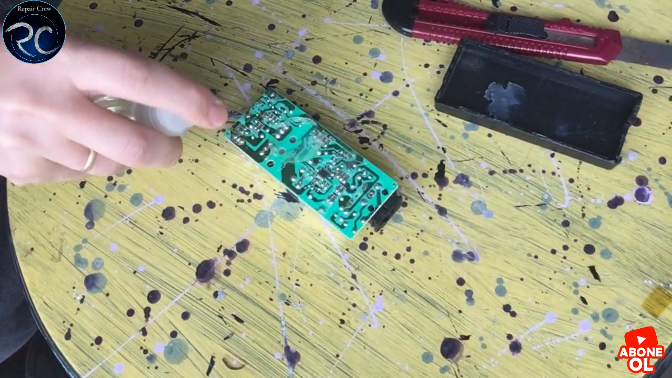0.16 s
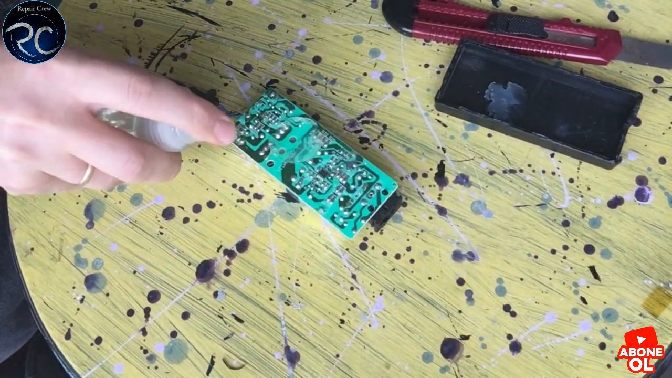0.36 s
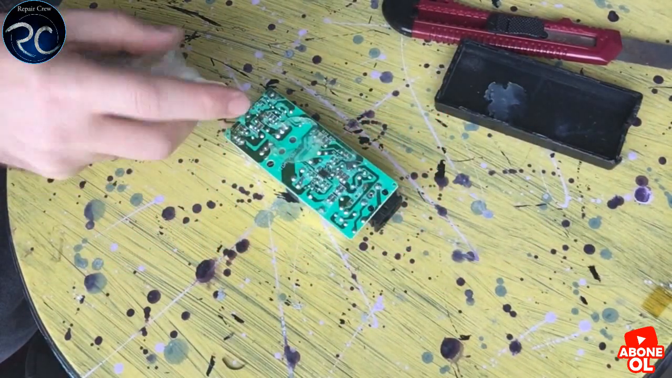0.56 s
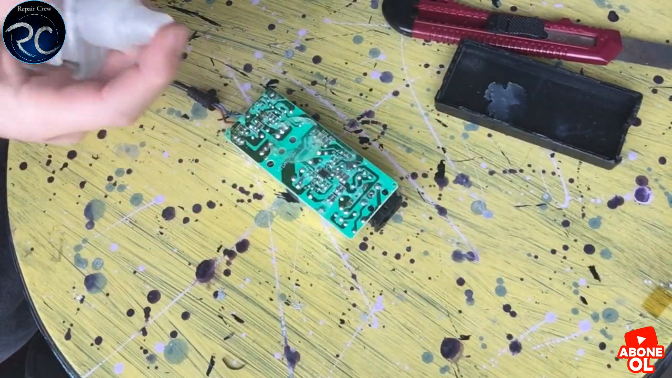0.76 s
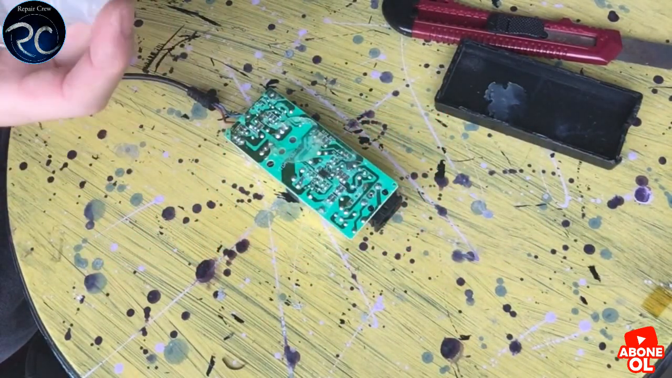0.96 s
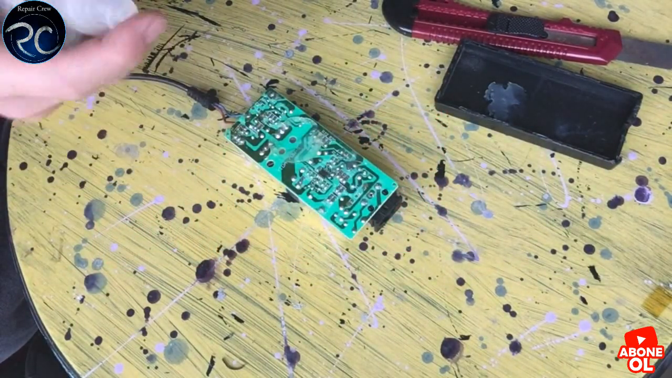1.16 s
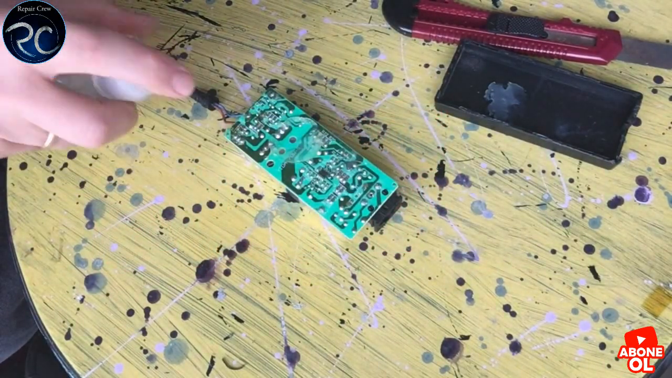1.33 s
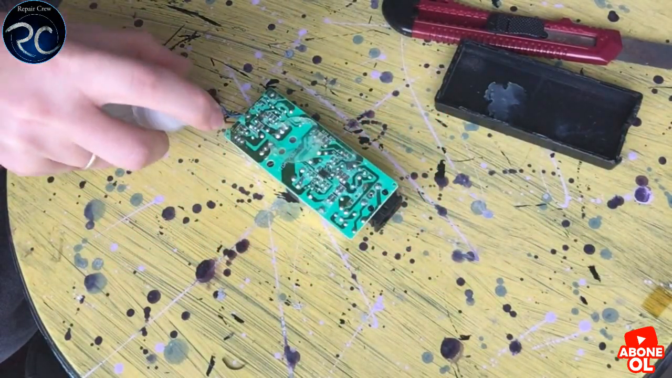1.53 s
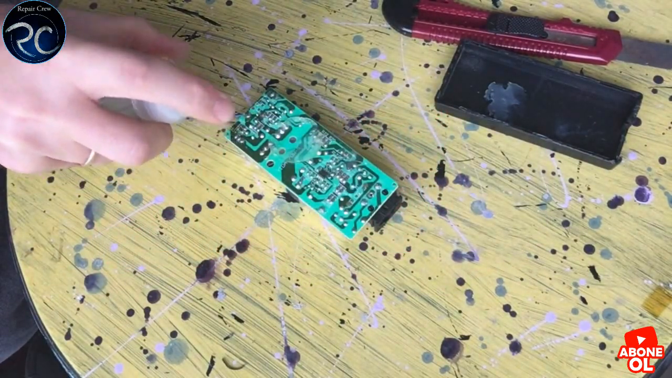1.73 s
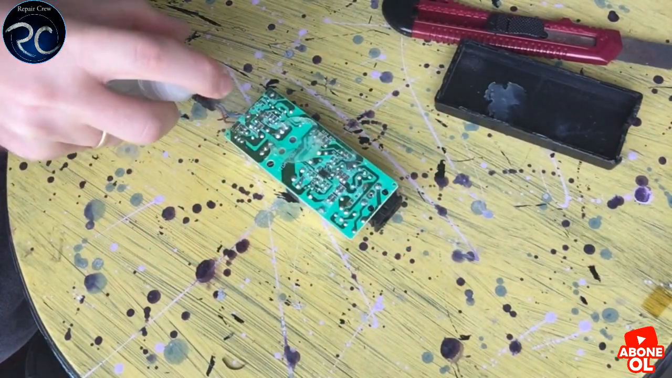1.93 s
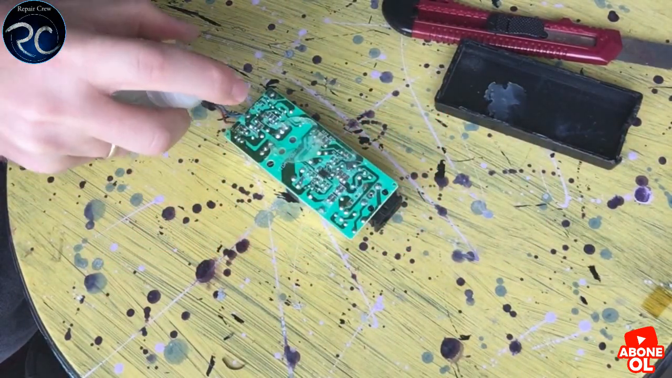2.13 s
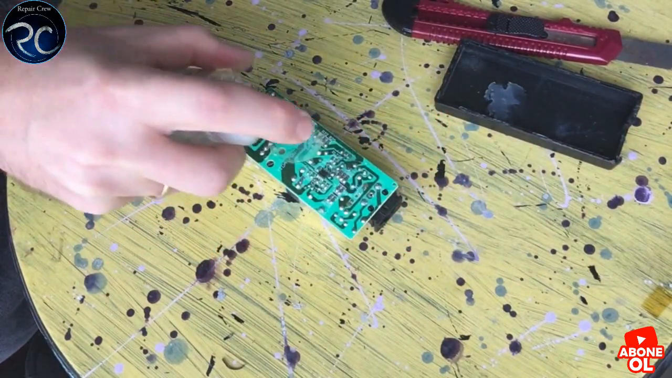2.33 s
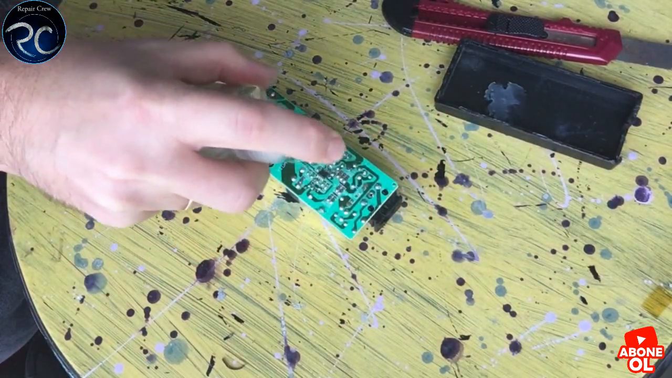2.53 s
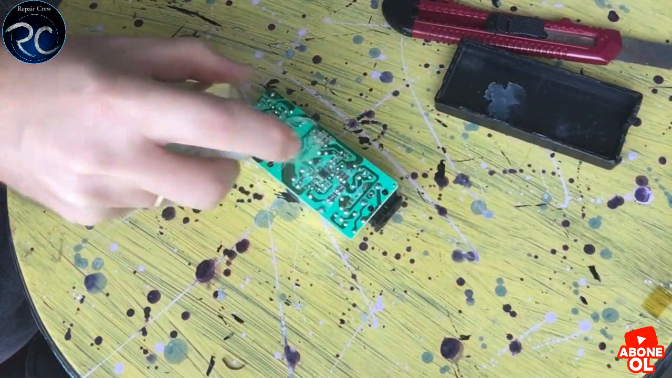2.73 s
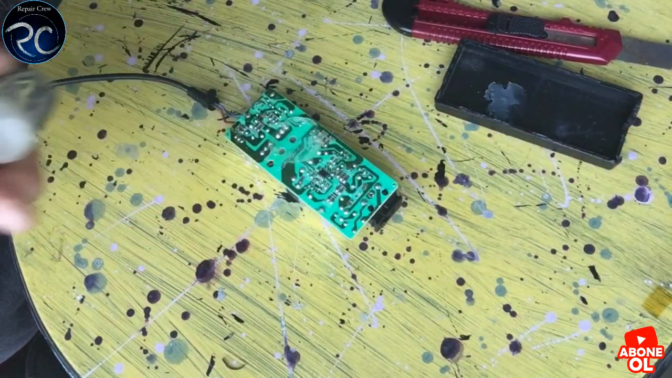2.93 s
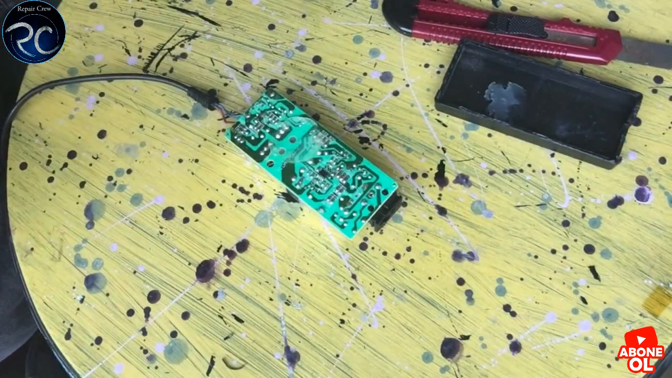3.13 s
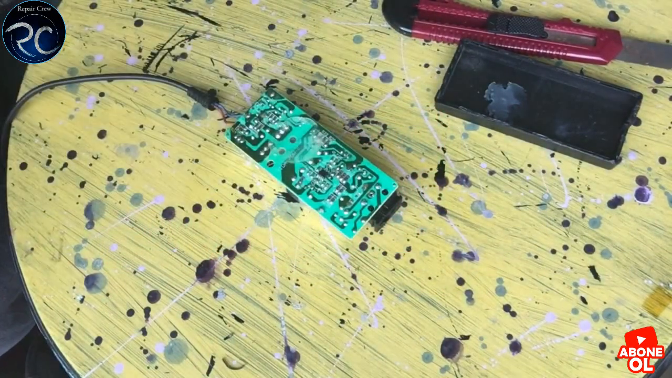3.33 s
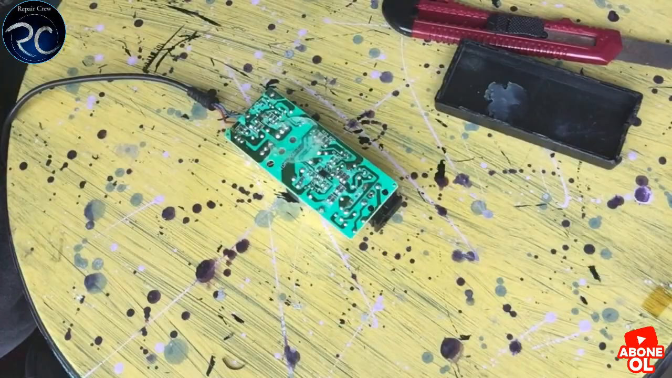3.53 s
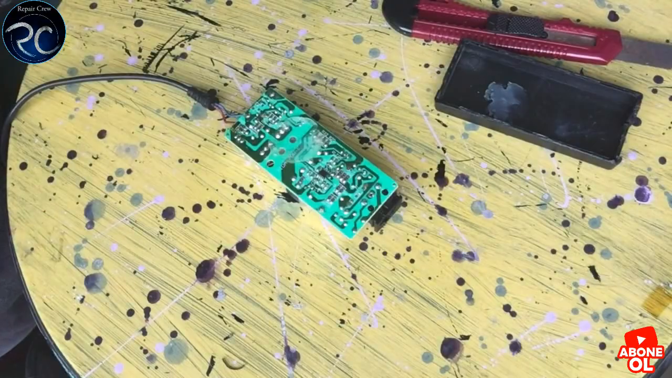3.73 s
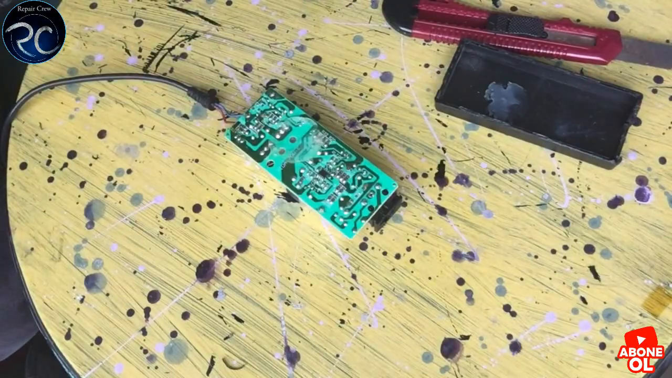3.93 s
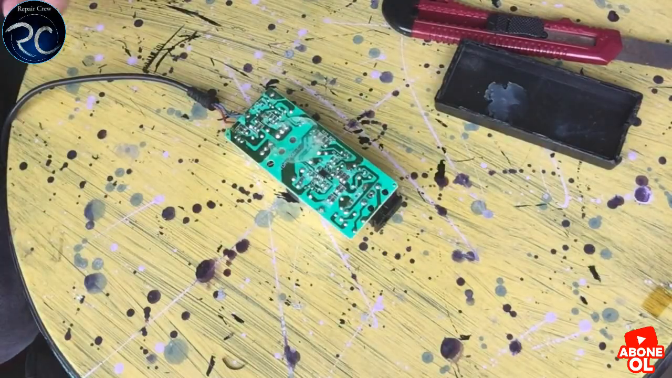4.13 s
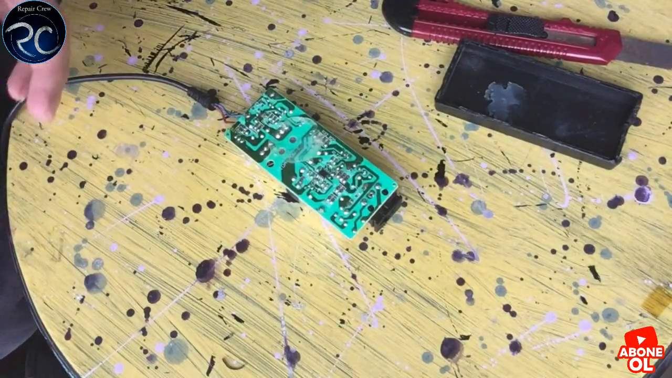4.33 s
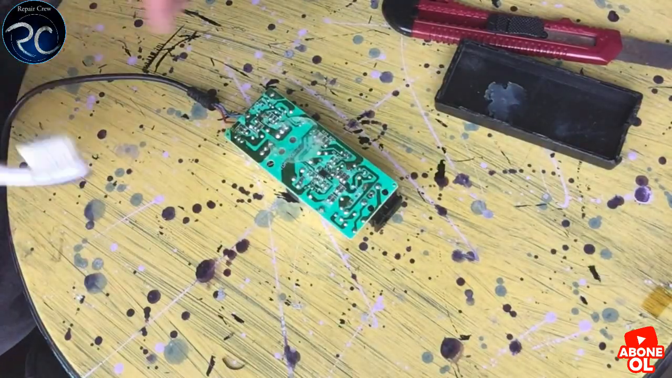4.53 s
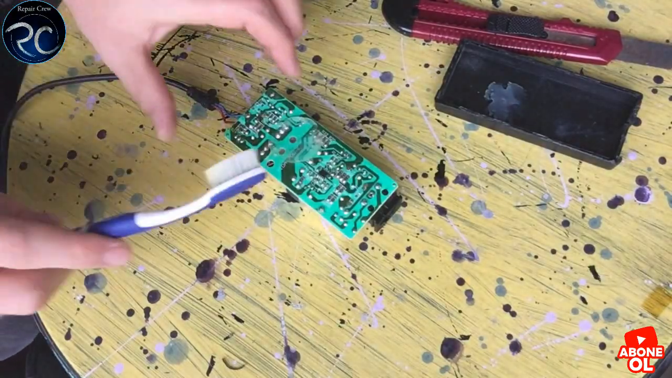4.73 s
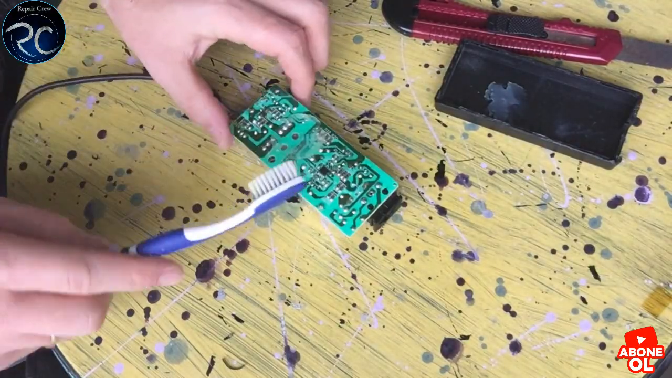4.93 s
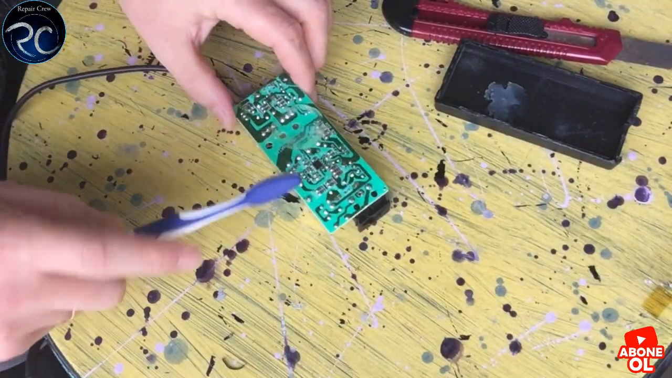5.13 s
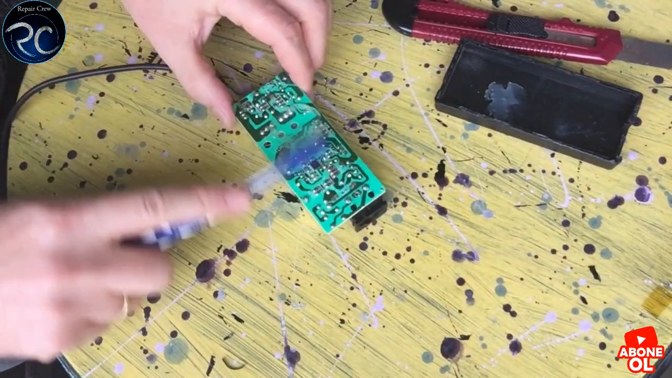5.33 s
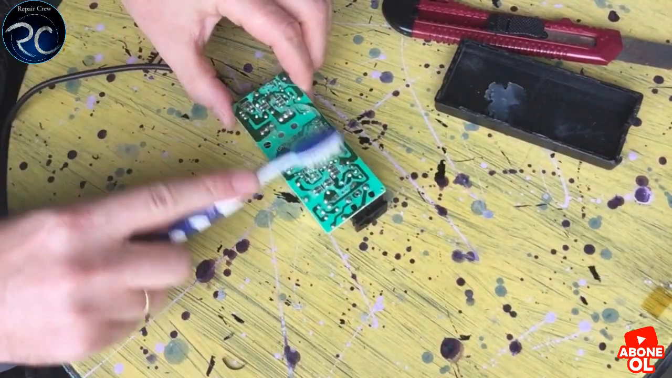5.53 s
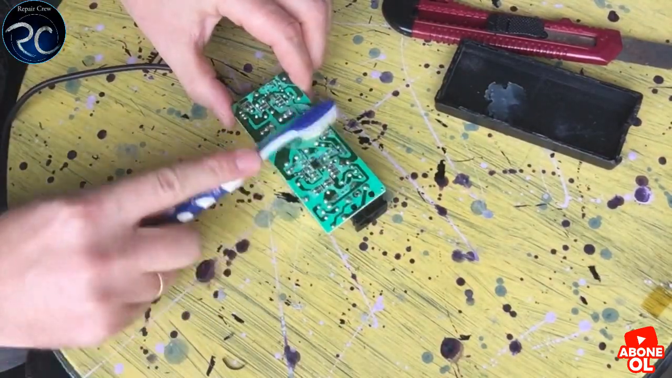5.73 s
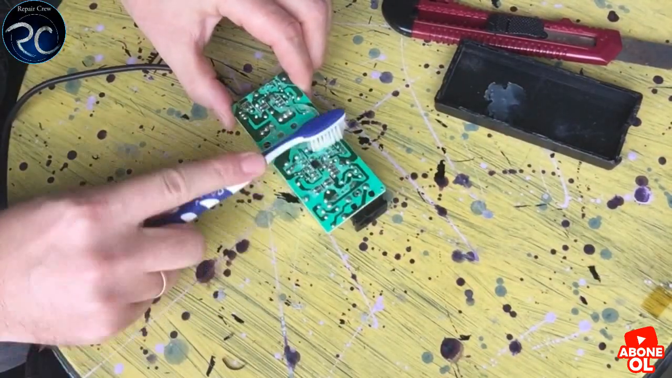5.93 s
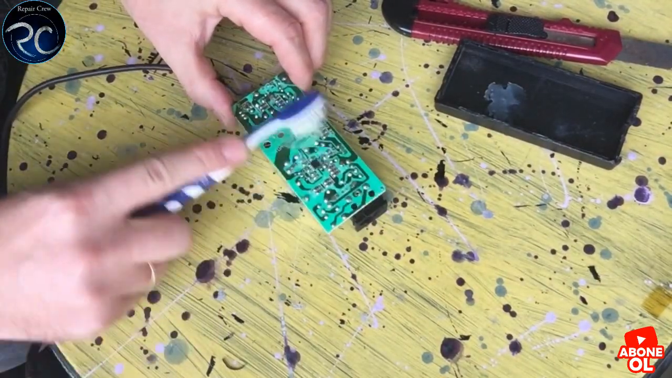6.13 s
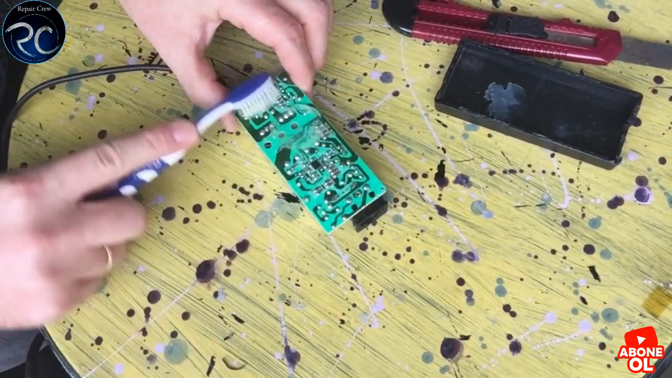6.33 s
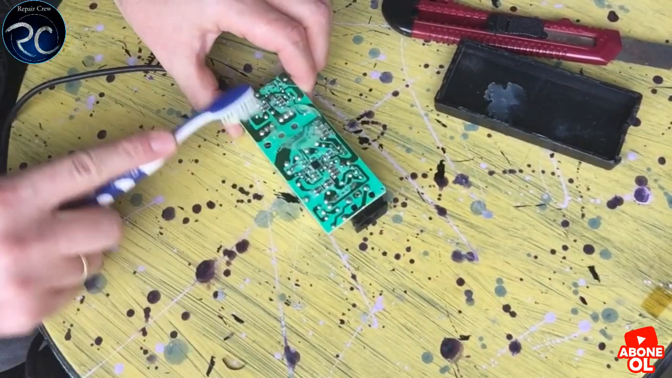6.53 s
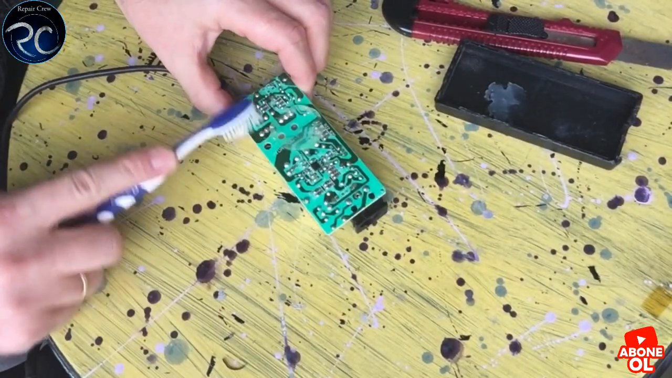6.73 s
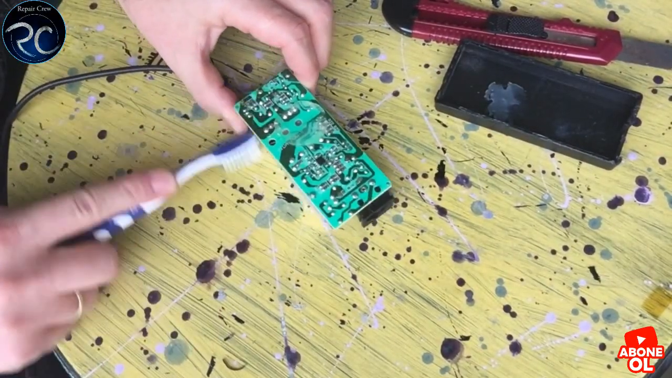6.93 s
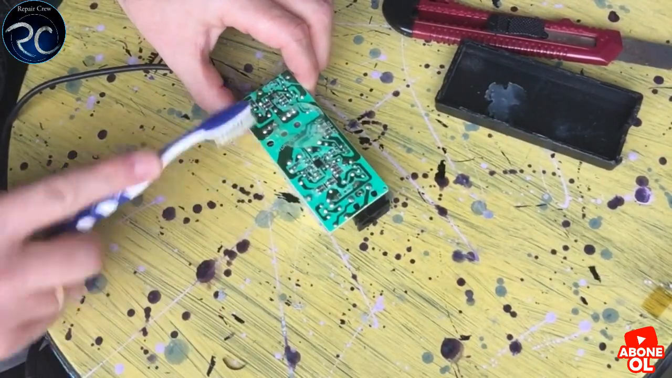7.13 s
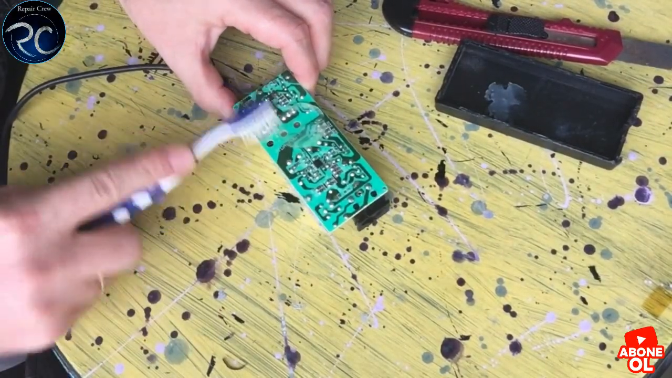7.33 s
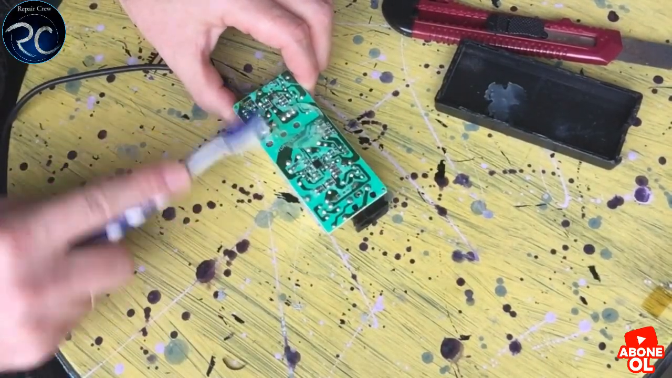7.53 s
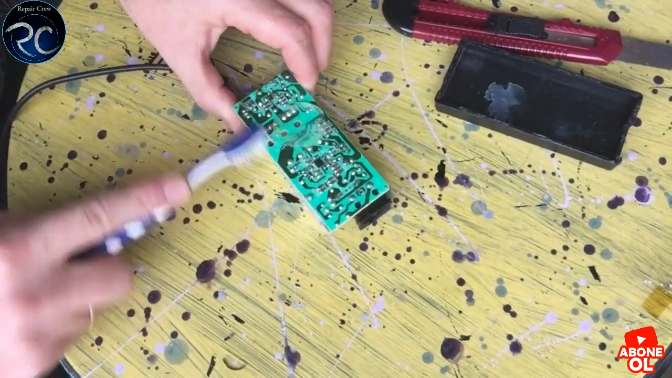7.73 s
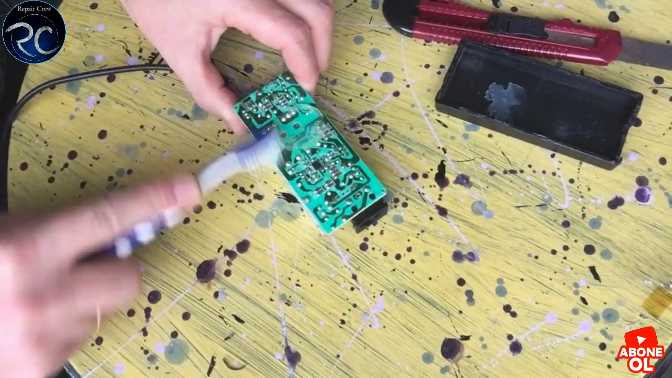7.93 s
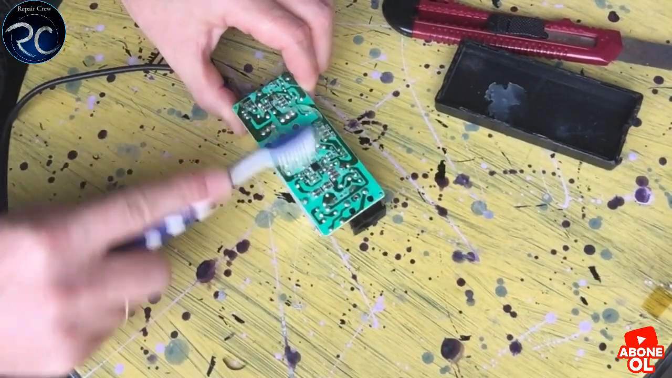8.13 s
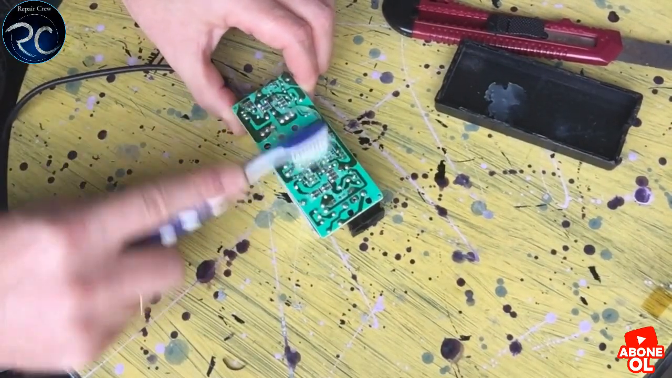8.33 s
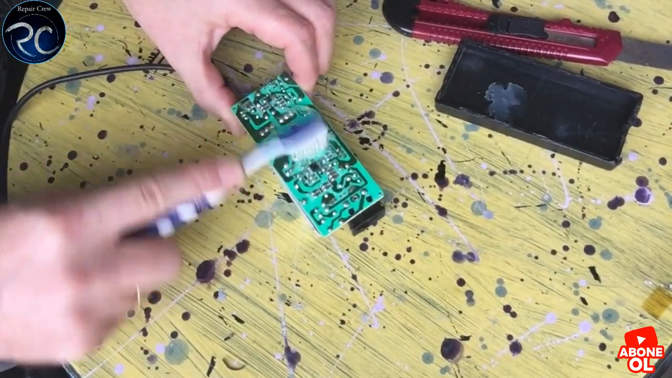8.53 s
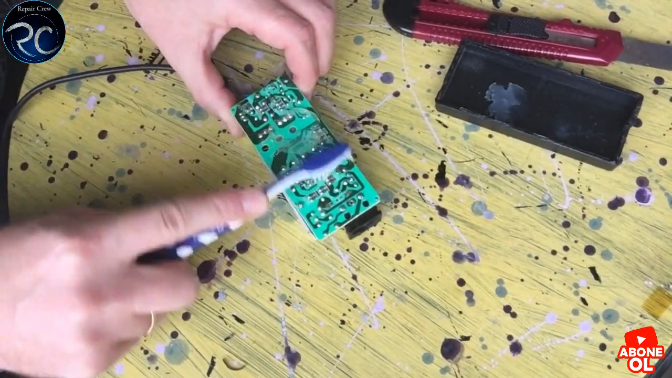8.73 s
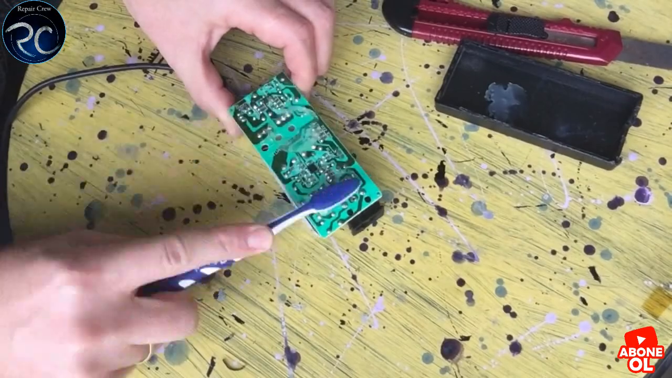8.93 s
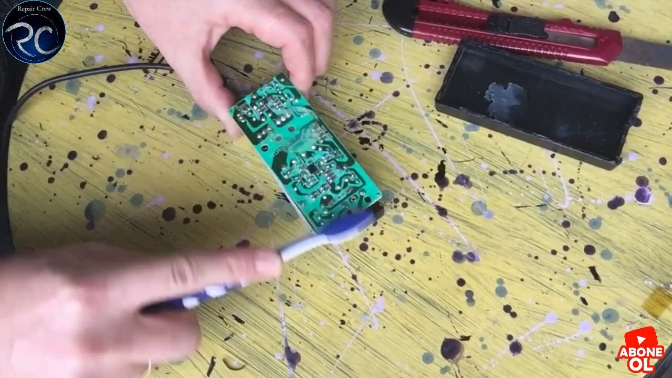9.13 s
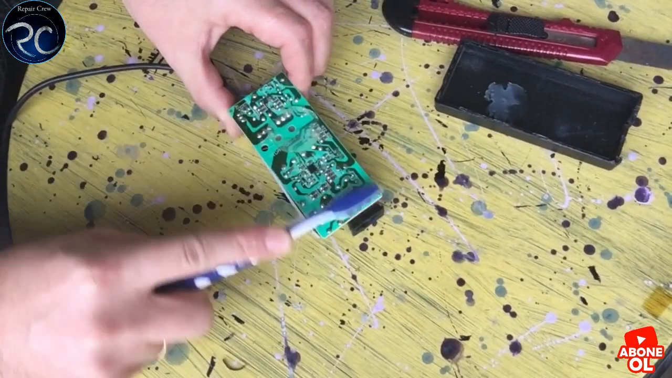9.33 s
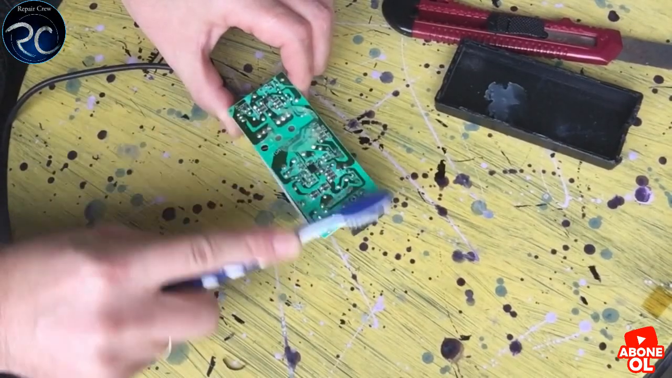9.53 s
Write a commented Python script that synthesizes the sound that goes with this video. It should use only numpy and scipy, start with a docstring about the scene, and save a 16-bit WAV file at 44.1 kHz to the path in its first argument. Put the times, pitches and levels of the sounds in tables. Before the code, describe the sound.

In a small quiet room, a microphone just above a workbench picks up six short, clicking spritzes from a pump bottle, which then thuds down. After a brief pause and a scuff, a toothbrush rasps rapidly to and fro over a circuit board for the whole second half. The bristles snag and click on the solder pins and the board bumps the bench, over faint room air and mains hum.

```python
"""A workbench in a small quiet room, one microphone just above it. A finger pump sprays cleaner six times
onto a bare circuit board, clicking and hissing, and near 4 s the bottle is set down with a thud. A hand
grips the board, which scuffs over the bench. From 5.3 s a toothbrush scrubs it, nearly ten strokes a second:
the bristles flick over the solder pins, the brush head bumps and snags on them, and the rocking board knocks
on the bench top. Room air, microphone hiss and a faint mains hum lie underneath."""
import sys
import numpy as np
from scipy import signal
from scipy.fft import rfft, irfft, next_fast_len
from scipy.io import wavfile
from scipy.ndimage import map_coordinates

SR = 44100
rng = np.random.default_rng(int(sys.argv[2]) if len(sys.argv) > 2 else 0)


def dump_mix(stems):
    """Bounce the given channels to the path in sys.argv[1] as a 16-bit WAV at rate SR."""
    frames = np.atleast_2d(stems).T  # one column per channel
    limited = np.clip(frames, -1, 1)  # hard clip at full scale
    pcm = np.round(limited * 32767).astype(np.int16)
    wavfile.write(sys.argv[1], SR, pcm)


N = 422037
AGE = np.arange(SR // 4) / SR  # seconds since a blow
TOP_HZ = 15100  # upper band limit

# resonances of the circuit board: pitch_hz, width_hz, level_db
BOARD_MODES = [(601, 54.4, -6.5), (671.5, 51.3, 1), (759, 64, -4.5), (1078, 56, -21.5)]
# resonances of the bench top: pitch_hz, width_hz, level_db
BENCH_MODES = [(115, 20, -11), (185, 21.5, -2), (198.9, 14.3, 2.5), (255.2, 12.3, -1.5), (305, 68, -18),
               (354.2, 32, -10), (464, 110, -27)]
# spectrum of the brush's hiss and crack on the board: frequency_hz, level_db
HISS_SPECTRUM = [(2500, -16), (4200, 5.5), (5000, 2.5), (6600, -11), (7700, 1.5), (8800, -1),
                 (10300, -13.5), (11200, -15.5), (15000, -43)]


def scrubbing():
    """Bristles hiss over the lacquer and flick off the pins, shaking the board and the bench under it."""
    # brush strokes, to and fro: start_s, length_s, rasp_db, board_db, bench_db, hiss_db
    strokes = [(5.305, 0.09, -50, -68, -49.5, -74), (5.408, 0.08, -44, -53.5, -47, -71.5),
               (5.499, 0.14, -50.5, -51.5, -45.5, -71), (5.62, 0.12, -53.5, -56, -51.5, -77),
               (5.721, 0.14, -53, -54.5, -60, -73.5), (5.833, 0.11, -51.5, -57, -48, -75),
               (5.948, 0.11, -50, -50.5, -47, -71), (6.046, 0.12, -52, -54, -48, -71),
               (6.177, 0.12, -49.5, -65, -55, -72), (6.264, 0.1, -47.5, -55.5, -61, -71),
               (6.379, 0.11, -48, -61.5, -49, -74), (6.475, 0.1, -49.5, -50.5, -45.5, -74),
               (6.573, 0.11, -49.5, -62, -48.5, -73), (6.663, 0.11, -48.5, -60, -46.5, -73),
               (6.776, 0.13, -46.5, -55.5, -48.5, -74), (6.88, 0.078, -45.5, -35, -40, -92),
               (7.211, 0.075, -43.5, -57.5, -47, -71), (7.3, 0.072, -46.5, -65, -52, -71.5),
               (7.408, 0.1, -45, -61, -45, -71), (7.492, 0.1, -46, -57, -46, -69),
               (7.598, 0.103, -45, -52, -43, -68.5), (7.686, 0.12, -49.5, -49.5, -45, -69.5),
               (7.792, 0.15, -52, -61.5, -50, -75.5), (7.887, 0.12, -48.5, -60, -47, -71.5),
               (7.998, 0.11, -48, -64, -64, -72), (8.096, 0.11, -49, -55.5, -46.5, -70.5),
               (8.202, 0.12, -47.5, -67, -56, -68), (8.308, 0.11, -48, -50.5, -43.5, -68),
               (8.41, 0.1, -49, -57.5, -50.5, -67), (8.506, 0.11, -46.5, -52.5, -40, -67.5),
               (8.613, 0.11, -40, -64, -53, -65.5), (8.728, 0.12, -51.5, -62, -51, -73.5),
               (8.843, 0.092, -46, -53.5, -49, -66), (8.956, 0.12, -50, -62, -54, -70),
               (9.056, 0.11, -48, -52.5, -45, -64.5), (9.16, 0.099, -50.5, -60, -49, -69),
               (9.258, 0.099, -49, -59.5, -49.5, -66), (9.363, 0.11, -51, -62.5, -49.5, -71.5),
               (9.474, 0.094, -47.5, -56, -45, -64.5)]
    # bristles rasping on the pins: frequency_hz, level_db
    rasp_spectrum = [(300, -36.5), (800, -23), (1110, -10), (1260, -15), (1450, -5.5), (1770, -7),
                     (2080, 1), (2280, -12), (2500, 0.5), (2830, 3.5), (3100, -7), (3450, -10.5),
                     (3900, -16.5), (4340, -50), (5640, -40), (9000, -59.5)]
    # the bench's low rumble: frequency_hz, level_db
    rumble_spectrum = [(20, -33), (30, -10), (43, 13.0), (62, -15.5), (90, -22.5), (120, -12.5),
                       (250, -26.5), (2000, -92.5)]
    overhang_s = 0.012  # board and bench keep moving after the brush turns
    rumble = unit(colour(rng.standard_normal(N + SR), rumble_spectrum))
    out = np.zeros(N)
    for start, length, rasp_db, board_db, bench_db, hiss_db in strokes:
        end = start + length
        first = round(start * SR)
        count = round((end + overhang_s) * SR) - first
        # tufts catch on rows of pins, so the flicks come in clumps
        catch = amp(3.2 * wobble(count, rate=74.7))
        bristles = unit(flicks(count, rate=1500, spread_db=4)) + 0.66 * rng.standard_normal(count)
        drag = catch * bristles + amp(2) * tufts(count)
        grit = catch * flicks(count, rate=4000, spread_db=4)
        hiss = unit(colour(grit, shaded(HISS_SPECTRUM, depth_db=3.5)))
        rasp = unit(colour(drag, shaded(rasp_spectrum, depth_db=3)))
        # only a few strong flicks rock the board
        jolts = flicks(count, rate=110, spread_db=6) + 0.012 * drag
        board = unit(shaken(jolts, BOARD_MODES, spread_db=4, detune=0.06))
        bench = unit(shaken(jolts, BENCH_MODES, spread_db=6, detune=0.06))
        bench += amp(-12) * rumble[first:first + count]
        shake = amp(board_db) * board + amp(bench_db) * bench
        sweep = swell(start, end, rest=0.013, power=1.9, lean=0.76)
        # the bent bristles bite hardest a little before mid-stroke
        bite = swell(start, end, rest=0.04, power=1.7, lean=0.9)
        rocking = swell(start, end + overhang_s, rest=0, power=0.81, lean=0.95)
        add(out, start, sweep * amp(hiss_db) * hiss[:len(sweep)])
        add(out, start, bite * amp(rasp_db) * rasp[:len(bite)])
        add(out, start, rocking * shake)
    return out


def tufts(count, rate=110, t60=0.016):
    """Bent tufts let go unevenly, about rate a second; each scratches briefly."""
    jitter, size = rng.standard_normal((2, 64))
    onsets = (np.cumsum(np.exp(0.45 * jitter)) * SR / rate).astype(int)
    lets_go = np.bincount(onsets, amp(3.2 * np.clip(size, -2, 2)), count)[:count]
    envelope = signal.lfilter([1], [1, -amp(-60 / (t60 * SR))], lets_go)
    return unit(envelope * rng.standard_normal(count))


def bumps():
    """A struck pin pings and rattles; a moment later the rocking board and the bench top answer."""
    # the hand grips the board or the brush head hits it:
    # start_s, tick_db, rattle_t60_s, board_db, bench_db, bench_pitch_hz
    hits = [(4.881, -80, 0.14, -79, -46, 223), (4.937, -73, 0.37, -57, -35.5, 195),
            (5.059, -64, 0.16, -62, -41.5, 253), (5.256, -54, 0.15, -71, -41.5, 189),
            (5.322, -67, 0.089, -48.5, -40, 190), (5.461, -46.5, 0.038, -64, -43, 237),
            (5.529, -39, 0.1, -52, -41, 201), (5.572, -52, 0.057, -55, -45, 230),
            (5.69, -53, 0.061, -66, -44, 249), (5.743, -47, 0.066, -47.5, -41.5, 172),
            (5.759, -40.5, 0.05, -50.5, -56, 250), (5.92, -58.5, 0.024, -60, -46, 196),
            (5.967, -40, 0.072, -52.5, -46.5, 276), (5.995, -44, 0.0066, -67, -45.5, 308),
            (6.022, -64, 0.14, -51, -51, 227), (6.12, -41.5, 0.12, -69, -39.5, 202),
            (6.219, -49, 0.26, -51, -37, 184), (6.284, -40.5, 0.064, -71, -42, 187),
            (6.493, -39, 0.12, -64, -35, 241), (6.549, -52, 0.045, -54, -49, 224),
            (6.599, -42, 0.063, -47.5, -43, 179), (6.677, -46.5, 0.17, -52.5, -40.5, 184),
            (6.825, -44, 0.039, -70, -54, 200), (6.853, -34.5, 0.074, -53, -37, 178),
            (6.874, -54, 0.17, -43.5, -27, 191), (6.892, -38.5, 0.24, -49, -27, 187.4),
            (6.946, -54, 0.36, -45, -41, 188), (7.168, -50.5, 0.1, -56.5, -43, 264),
            (7.237, -47, 0.25, -61, -37.5, 203.5), (7.415, -45, 0.091, -56, -43.5, 210),
            (7.531, -48, 0.45, -65, -36, 195), (7.587, -56, 0.061, -48.5, -48, 220),
            (7.632, -50, 0.061, -61, -43, 218), (7.714, -44, 0.027, -41, -39, 298),
            (7.875, -45.5, 0.027, -66, -52, 216), (8.004, -47, 0.26, -40, -34.5, 198),
            (8.14, -50, 0.22, -58, -35.5, 179), (8.216, -38, 0.11, -35.5, -31.5, 197),
            (8.323, -47.5, 0.026, -63, -50, 200), (8.374, -61, 0.16, -58, -40.5, 212),
            (8.425, -39, 0.037, -59, -43, 190), (8.8, -52, 0.86, -46.5, -38, 185),
            (9.008, -65, 0.45, -74, -43.5, 214), (9.072, -45, 0.052, -57, -38.5, 184),
            (9.087, -81, 0.051, -51.5, -41, 200), (9.419, -52, 0.15, -73, -49, 219),
            (9.482, -39.5, 0.067, -62, -40.5, 192)]
    # the rattle on the pins: frequency_hz, level_db
    rattle_spectrum = [(300, -35), (900, -17), (1300, -13.5), (1700, -2.5), (1950, 1.5), (2200, 2),
                       (2450, -6.5), (2750, 4.5), (3050, 0.5), (3400, -17), (4000, -24.5), (4400, -43.5),
                       (5600, -34.5), (9000, -59)]
    board_lag_s, bench_lag_s = 0.001895, 0.00313
    out = np.zeros(N)
    for start, tick_db, t60, board_db, bench_db, bench_hz in hits:
        contact = chatter(t60, snap=0.58)
        # the shorter the contact, the brighter the tick
        crack = amp(-44) * np.sqrt(0.024 / t60) * blow(colour(contact, HISS_SPECTRUM))
        pin_hz = 2700 * np.exp(0.049 * rng.standard_normal())
        ping = blow(note(pin_hz, t60=0.015, rise=0.00055))
        rattle = blow(colour(contact, shaded(rattle_spectrum, depth_db=3.5)))
        tick = amp(-11.5) * ping + amp(-4) * rattle + crack
        # a brush that sticks instead of rattling also damps the board and the bench
        grip = amp(-60 * AGE / (3 * t60))
        board = blow(grip * ring(BOARD_MODES, spread_db=3.5, detune=0.043))
        # the spot that is pushed picks one bench mode to sing out over the others
        lead = blow(grip * note(bench_hz, t60=0.15, rise=0.007))
        others = blow(grip * ring(BENCH_MODES, spread_db=6, detune=0.066))
        bench = amp(-4.5) * lead + amp(-8) * others
        add(out, start, amp(tick_db) * tick)
        add(out, start + board_lag_s, amp(board_db) * board)
        add(out, start + bench_lag_s, amp(bench_db) * bench)
    return out


def snags():
    """The brush head cracks free of a pin and judders over the next ones; the board slaps down."""
    # the head snaps free: start_s, crack_db, judder_db, judder_length_s, board_db, bench_db
    catches = [(6.2422, -41, -61, .01, -48, -39.5), (6.923, -41, -40, 0.0033, -40, -40),
               (7.3647, -38.5, -62, .003, -50, -48.5), (7.672, -43, -58, 0.006, -48.5, -51),
               (7.7, -38, -47, 0.0099, -51, -41), (8.6374, -29, -29.5, 0.018, -28, -34)]
    # crack and judder on the pins: frequency_hz, level_db
    snag_spectrum = [(300, -26), (1000, -14), (1320, -16), (1500, -8.5), (1900, -2.5), (2180, 1),
                     (2400, -1), (2750, 3), (3050, -2), (3400, -17.5), (3900, -15), (4150, -31),
                     (4550, -31.5), (5600, -38), (9000, -68)]
    board_lag_s, bench_lag_s = 0.00273, 0.0055  # the board lands, then the bench gives
    out = np.zeros(N)
    for start, crack_db, judder_db, length, board_db, bench_db in catches:
        crack = blow(colour(burst(t60=0.017), snag_spectrum))
        onset = 1 - np.exp(-(AGE / 0.0027) ** 2)
        hold = amp(-40 * np.maximum(AGE / length - 1, 0))
        skips = unit(flicks(len(AGE), rate=2500, spread_db=3)) + 0.5 * rng.standard_normal(len(AGE))
        judder = blow(colour(onset * hold * skips, snag_spectrum))
        board = blow(amp(-60 * AGE / 0.048) * ring(BOARD_MODES, spread_db=0.5, detune=0.01))
        bench = blow(amp(-60 * AGE / 0.15) * ring(BENCH_MODES, spread_db=3, detune=0.043))
        add(out, start, amp(crack_db) * crack + amp(judder_db) * judder)
        add(out, start + board_lag_s, amp(board_db) * board)
        add(out, start + bench_lag_s, amp(bench_db) * bench)
    return out


def knocks():
    """The tilted board drops flat on the bench: a dull push and a brief judder as the contact settles."""
    # the board's drops: start_s, level_db
    drops = [(5.323, -42), (5.53, -43), (5.744, -42), (6.22, -41), (6.68, -39.5), (6.876, -37.5),
             (7.367, -39.5), (8.006, -49)]
    # board against bench: frequency_hz, level_db
    knock_spectrum = [(60, -18.5), (150, -1), (330, 8), (520, -1.5), (780, -4.5), (1050, -22.5),
                      (1500, -33), (4000, -60), (9000, -75)]
    out = np.zeros(N)
    for start, db in drops:
        push = (AGE == 0) + amp(-18.5) * burst(t60=0.031)
        add(out, start, amp(db) * blow(colour(push, knock_spectrum)))
    return out


def scuffs():
    """The gripped board drags a short way over the bench in small, uneven slips."""
    # the board's drags: start_s, length_s, level_db
    drags = [(4.878, 0.05, -65.5), (4.919, 0.11, -49), (5.053, 0.065, -56.5), (5.245, 0.045, -57)]
    # board sliding on bench: frequency_hz, level_db
    scuff_spectrum = [(100, 2), (200, 6.5), (380, -8), (520, -4.5), (720, 9.5), (1000, -5), (1400, -10),
                      (2000, -6.5), (2900, -4), (3500, -32), (6000, -55)]
    out = np.zeros(N)
    for start, length, db in drags:
        push = swell(0, length, rest=0, power=1.1, lean=0.5)
        slips = amp(3 * wobble(len(push), rate=120)) * flicks(len(push), rate=1500, spread_db=4)
        add(out, start, amp(db) * unit(push * colour(slips, scuff_spectrum)))
    return out


def spray_bottle():
    """The finger lands, the nozzle opens and sprays, the plunger bottoms and springs back."""
    # presses of the pump: lands_s, opens_s, bottoms_s, land_db, open_db, bottom_db,
    # spray_length_s, mist_db, land_pitch_hz, bottom_pitch_hz
    presses = [(0.118, .178, .293, -60, -55, -67.5, 0.089, -70.5, 3000, 3000),
               (1.413, 1.513, 1.64, -55, -60, -60, 0.11, -73, 1990, 2880),
               (1.822, 1.866, 1.963, -52, -62, -58.5, 0.13, -76.5, 3080, 2700),
               (2.101, 2.142, 2.241, -49.5, -54.5, -52, 0.12, -77.5, 3130, 2790),
               (2.342, 2.379, 2.484, -49.5, -61, -46, 0.14, -83, 3260, 2650),
               (2.588, 2.637, 2.744, -51.5, -54.5, -43.5, 0.16, -80, 3140, 2700)]
    # the plunger springs back: start_s, relative_level_db
    releases = [(.318, -67), (1.661, -60), (1.995, -58.5), (2.286, -60), (2.507, -61), (2.784, -38.5)]
    # the returning plunger's clack: frequency_hz, level_db
    spring_spectrum = [(300, -18), (700, -20), (1050, -2.5), (1400, -9), (1750, 5), (2100, 3), (2500, 13),
                       (3200, -11), (4200, -33), (9000, -65)]
    # the bottle ticks in the hand: start_s, level_db
    handling = [(0.913, -66), (1.222, -69), (2.846, -73), (3.53, -73.5)]
    out = np.zeros(N)
    for lands, opens, bottoms, land_db, open_db, bottom_db, length, mist_db, land_hz, bottom_hz in presses:
        add(out, lands, pump_click(land_db, bottle_db=land_db - 13.5, t60=0.062, hz=land_hz))
        add(out, opens, pump_click(open_db, bottle_db=open_db - 5.5, t60=0.068))
        add(out, opens, spray(length, mist_db))
        # the stop passes the push straight into the bottle
        bottle_db = 0.5 * bottom_db - 26.5
        add(out, bottoms, pump_click(bottom_db, bottle_db, t60=0.067, hz=bottom_hz, snap=1.9))
    for start, db in releases:
        add(out, start, pump_click(db - 4.5, bottle_db=db - 27, t60=0.1))
        add(out, start, amp(db + 0.5) * blow(colour(chatter(0.023, snap=0.32), spring_spectrum)))
    for start, db in handling:
        add(out, start, pump_click(db, bottle_db=db - 8, t60=0.06))
    return out


def pump_click(tick_db, bottle_db, t60, hz=2835, snap=0.18):
    """The pump head ticks and rings at a pitch set by the finger's grip; the bottle under it answers."""
    # the plastic head's tick: frequency_hz, level_db
    head_spectrum = [(300, -14), (700, -16), (1050, -21), (1350, -22.5), (1800, 3.5), (2300, -2),
                     (2700, 9.5), (3050, 5.5), (3500, -10.5), (4300, -25), (5400, -39), (6600, -60),
                     (8800, -54), (11000, -53)]
    # resonances in which the head rings on: pitch_hz, width_hz, level_db
    head_modes = [(2740, 33, 0), (2960, 16, 6.5), (3040, 24, -5.5)]
    # the bottle's body: frequency_hz, level_db
    bottle_spectrum = [(100, -37), (270, 8), (370, 4), (500, -3.5), (700, -4), (1080, -4), (1500, -28),
                       (2200, -21), (4000, -34), (10000, -62)]
    pitch = hz * np.exp(0.019 * rng.standard_normal())
    tick = blow(colour(chatter(t60, snap), shaded(head_spectrum, depth_db=-0.5)))
    ping = blow(note(pitch, t60=0.22 * t60, rise=0.025 * t60))
    tail = blow(ring(head_modes, spread_db=4, detune=0.012))
    head = amp(-2.5) * tick + amp(-3) * ping + amp(-5) * tail
    bottle = blow(colour(chatter(0.029, snap=0.64), bottle_spectrum))
    # the valve rattles much alike whether the press is hard or soft
    return amp(tick_db) * head + amp(bottle_db) * bottle + valve(0.45 * tick_db - 42.5)


def valve(db):
    """The pump's little valve snaps and rattles."""
    # the valve's rattle: frequency_hz, level_db
    valve_spectrum = [(2000, -29), (3300, 14), (4400, -6), (5300, 5), (6000, -20), (6800, -24), (8800, -16),
                      (11000, -33.5)]
    return amp(db) * blow(colour(chatter(0.03, snap=0.51), valve_spectrum))


def spray(length, mist_db, nozzle_db=-57):
    """The nozzle rushes; the fine mist is thickest early, while the pressure is high."""
    # the nozzle's rush: frequency_hz, level_db
    nozzle_spectrum = [(150, -43), (400, -26), (1200, -13), (2200, -14.5), (2700, -3), (3050, -6.5),
                       (3500, -12.5), (4400, -31), (5400, -31), (6600, -38), (12000, -55)]
    # the mist's hiss: frequency_hz, level_db
    mist_spectrum = [(4000, -36), (6800, -16), (8300, 0), (9300, -1), (10400, -19), (11600, -18),
                     (15000, -27)]
    flow = swell(0, length, rest=0, power=1.0, lean=0.65)
    thickness = swell(0, length, rest=0, power=1.4, lean=0.41)
    sputter = amp(1.7 * wobble(len(flow), rate=131))
    nozzle = unit(colour(sputter * flicks(len(flow), rate=4000, spread_db=2), nozzle_spectrum))
    mist = unit(colour(sputter * rng.standard_normal(len(flow)), mist_spectrum))
    return amp(nozzle_db) * flow * nozzle + amp(mist_db) * thickness * mist


def bottle_landings():
    """The bottle's base clacks on the bench, which thuds and keeps humming faintly."""
    # the bottle knocks on the bench, is put down and settles: start_s, clack_db, thud_db
    landings = [(1.484, -64, -49), (3.877, -46, -36.5), (3.885, -52, -33), (3.914, -72, -63),
                (4.04, -86, -59), (4.079, -81, -56), (4.147, -86, -58.5)]
    # resonances of the bench under the bottle: pitch_hz, width_hz, level_db
    thud_modes = [(115, 27, -2), (160, 28, 8.5), (196, 42, 7.5), (278, 29, 1), (329, 22, 5.5),
                  (412, 69, -5), (713, 140, -13.5)]
    # the base's clack: frequency_hz, level_db
    clack_spectrum = [(200, -15), (500, -10), (750, -4.5), (1070, 3), (1400, -5.5), (2300, -10.5),
                      (3100, -4), (3600, -14), (4400, -23), (7000, -41), (11000, -58)]
    out = np.zeros(N)
    for start, clack_db, thud_db in landings:
        thud = blow(ring(thud_modes, spread_db=2))
        hum = amp(-13) * blow(note(hz=154, t60=0.82, rise=0.0081))
        clack = blow(colour(chatter(0.092, snap=1.0), clack_spectrum))
        add(out, start, amp(clack_db) * clack + amp(thud_db) * (thud + hum))
    return out


def squeaks():
    """Plastic sticks and slips in thin, wavering chirps that sink as the slip slows."""
    # first the pump's plunger, later the wet bristles: start_s, length_s, pitch_hz, level_db
    slips = [(2.377, 0.014, 2580, -56), (2.429, 0.043, 2734, -55), (2.659, 0.017, 2810, -51),
             (2.695, 0.033, 2780, -57.5), (7.316, 0.025, 2820, -46), (7.551, 0.022, 2855, -49),
             (7.717, 0.08, 2830, -53), (7.803, 0.02, 2820, -48), (7.962, 0.023, 2800, -46),
             (8.148, 0.026, 2730, -52.5), (8.359, 0.02, 2880, -50), (8.558, 0.021, 2700, -55),
             (8.617, 0.017, 2770, -45)]
    fall, waver = 0.063, 0.039  # shares of the pitch
    out = np.zeros(N)
    for start, length, hz, db in slips:
        flow = swell(0, length, rest=0, power=0.84)
        count = len(flow)
        pitch = hz * (1 + fall * np.linspace(0.5, -0.5, count) + waver * wobble(count, rate=540))
        tone = amp(3.3 * wobble(count, rate=180)) * np.sin(2 * np.pi * np.cumsum(pitch) / SR)
        add(out, start, amp(db) * unit(flow * tone))
    return out


def snaps():
    """Hard plastic snaps: the valve shuts after a press; later a stiff bristle springs off a pin."""
    # the snaps: start_s, level_db
    ticks = [(2.267, -72), (2.508, -72), (2.765, -72), (6.901, -63)]
    # small, hard plastic: frequency_hz, level_db
    snap_spectrum = [(1500, -12), (3300, 5), (5400, 10), (6300, -14), (8000, -10), (9500, -45)]
    out = np.zeros(N)
    for start, db in ticks:
        add(out, start, amp(db) * blow(colour(burst(t60=0.0036), snap_spectrum)))
    return out


def room(x):
    """The near walls' short answer reaches the microphone 5 ms late and dulls as it dies."""
    # the room's decay: frequency_hz, t60_s
    decay_times = [(150, 0.44), (700, 0.22), (3000, 0.23), (10000, 0.074)]
    hz, t, noise = signal.stft(rng.standard_normal(SR // 2), SR, nperseg=256)
    decay = amp(-60 * t / along(decay_times, hz)[:, None])
    tail = signal.istft(noise * decay, SR, nperseg=256)[1]
    tail *= np.arange(len(tail)) > 0.005 * SR
    return signal.fftconvolve(x, tail / np.linalg.norm(tail))[:N]


def background():
    """Still room air, microphone hiss and a faint mains hum."""
    # air and hiss: frequency_hz, level_db
    air_spectrum = [(20, -19), (42, 2), (90, 0.5), (220, -5.5), (350, -12.5), (800, -18), (2000, -22.5),
                    (2600, -16.5), (3000, -18), (3600, -31), (5600, -33.5), (7500, -38.5), (10300, -45),
                    (15000, -46)]
    # mains hum: pitch_hz, level_db
    hum_partials = [(100, -71.5), (200, -71)]
    t = np.arange(N) / SR
    air = amp(-63) * unit(colour(rng.standard_normal(N), air_spectrum))
    hum = sum(amp(db) * np.sqrt(2) * np.sin(2 * np.pi * hz * t) for hz, db in hum_partials)
    return air + hum


def ring(modes, spread_db=0, detune=0):
    """A body's answer to one tap; the spot and the hand's pressure shift each mode's strength and pitch."""
    strength, shift = rng.standard_normal((2, len(modes)))
    contact = 1 - np.exp(-(AGE / 0.00013) ** 2)  # the push builds up over the contact time
    out = np.zeros(len(AGE))
    for k, (hz, width, db) in enumerate(modes):
        gain = (-1) ** k * width * amp(db + spread_db * strength[k])
        pitch = hz * (1 + detune * shift[k])
        out += gain * np.exp(-np.pi * width * AGE) * np.sin(2 * np.pi * pitch * AGE)
    return contact * out


def shaken(x, modes, spread_db, detune):
    """x shakes a body whose modes slide in pitch and strength as the brush travels over it."""
    out = np.zeros(len(x))
    for k, (hz, width, db) in enumerate(modes):
        pitch = hz * (1 + detune * wobble(len(x), rate=30))
        phasor = np.exp(2j * np.pi * np.cumsum(pitch) / SR)
        push = x * amp(db + spread_db * wobble(len(x), rate=40))
        envelope = signal.lfilter([1], [1, -np.exp(-np.pi * width / SR)], push / phasor)
        out += (-1) ** k * width * np.imag(phasor * envelope)
    return out


def note(hz, t60, rise):
    """One mode that builds up while it is pushed and then dies away."""
    return (1 - np.exp(-(AGE / rise) ** 2)) * amp(-60 * AGE / t60) * np.sin(2 * np.pi * hz * AGE)


def chatter(t60, snap):
    """A hard first contact and the uneven rattle after it; a long rattle also takes longer to build up."""
    life = max(t60, 0.01)
    first = snap * amp(-60 * AGE / 0.005)
    onset = 1 - np.exp(-AGE / (0.058 * life))
    rattle = onset * amp(wobble(len(AGE), rate=370) - 60 * AGE / life)
    return rng.standard_normal(len(AGE)) * (first + rattle)


def burst(t60):
    """Noise that starts at once and dies away."""
    return amp(-60 * AGE / t60) * rng.standard_normal(len(AGE))


def flicks(count, rate, spread_db):
    """Tiny impulses of uneven size at random moments, rate a second."""
    hit = rng.random(count) < rate / SR
    return hit * rng.choice([-1, 1], count) * amp(spread_db * np.clip(rng.standard_normal(count), -2, 2))


def swell(start, end, rest, power, lean=1):
    """Loudness of a movement that speeds up and slows; lean under 1 brings its peak forward."""
    progress = np.linspace(0, 1, round(end * SR) - round(start * SR))
    return rest + np.abs(np.sin(np.pi * progress ** lean)) ** power


def wobble(count, rate):
    """A smooth random curve, rate knots a second."""
    knots = rng.standard_normal(int(count * rate / SR) + 4)
    return map_coordinates(knots, [np.arange(count) * rate / SR])


def shaded(spectrum, depth_db):
    """The spectrum with some resonances stronger and some weaker, as at a new spot of contact."""
    knots_hz = np.geomspace(200, TOP_HZ, 44)
    hz = np.geomspace(100, TOP_HZ, 400)
    shade = np.interp(hz, knots_hz, np.clip(rng.standard_normal(len(knots_hz)), -2, 2))
    return np.transpose([hz, along(spectrum, hz) + depth_db * shade])


def colour(x, spectrum):
    """x through a causal (minimum-phase) filter with the given spectrum."""
    size = 2 * next_fast_len(len(x) // 2 + 4096)
    gain = amp(along(spectrum, np.fft.rfftfreq(size, 1 / SR)))
    cepstrum = irfft(np.log(gain), size)
    cepstrum[1:size // 2] *= 2
    cepstrum[size // 2 + 1:] = 0
    return irfft(rfft(x, size) * np.exp(rfft(cepstrum)), size)[:len(x)]


def along(points, hz):
    """(frequency_hz, value) points read on a log frequency axis."""
    knots_hz, values = np.transpose(points)
    return np.interp(np.log(hz + 1), np.log(knots_hz), values)


def amp(db):
    """Decibels to gain."""
    return 10 ** (np.asarray(db) / 20)


def unit(x):
    """Scaled to rms 1."""
    return x / np.sqrt(np.mean(x ** 2) + 1e-20)


def blow(x):
    """Scaled to the energy of rms 1 held for 30 ms."""
    return x * np.sqrt(0.03 * SR / (np.sum(x ** 2) + 1e-20))


def add(track, start_s, x):
    """Mix x into the track from start_s on."""
    part = track[round(start_s * SR):][:len(x)]
    part += x[:len(part)]


def scene():
    """Everything on the bench, heard in mono from just above it, with a little of the room."""
    board = scrubbing() + bumps() + snags() + scuffs() + knocks()
    direct = board + squeaks() + snaps() + spray_bottle() + bottle_landings()
    return (direct + amp(-14.5) * room(direct) + background())[None]


def record(dry):
    """The recorder keeps nothing above its band limit."""
    size = next_fast_len(N + SR // 2)
    in_band = np.fft.rfftfreq(size, 1 / SR) < TOP_HZ
    return irfft(rfft(dry, size) * in_band, size)[..., :N]


dry = scene()
out = record(dry)
dump_mix(out)
```